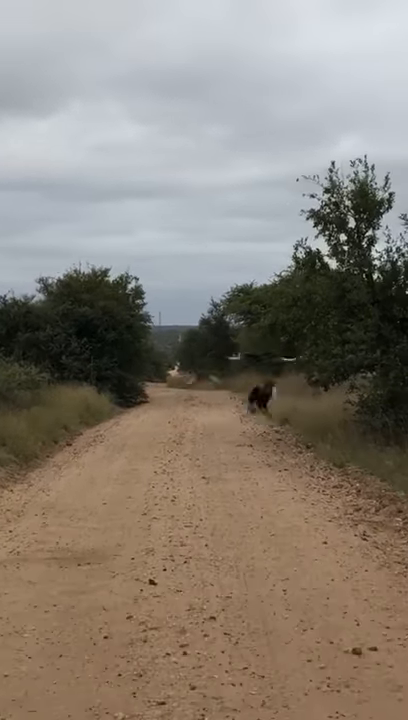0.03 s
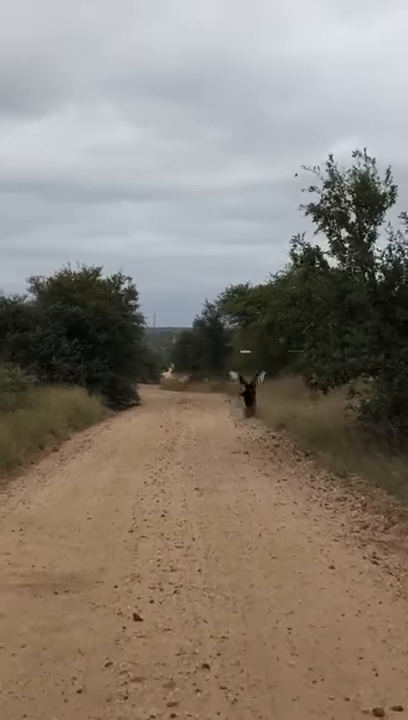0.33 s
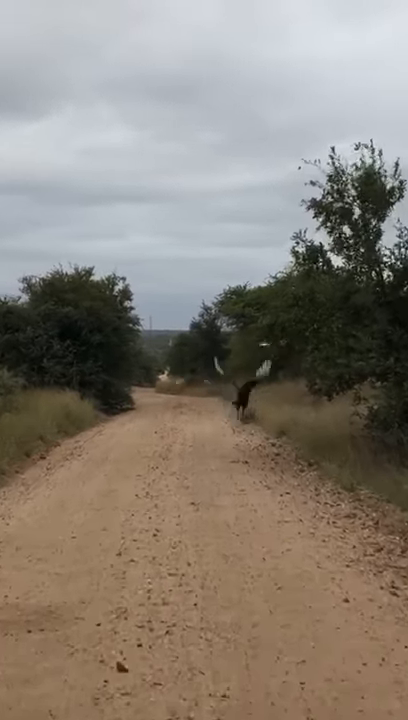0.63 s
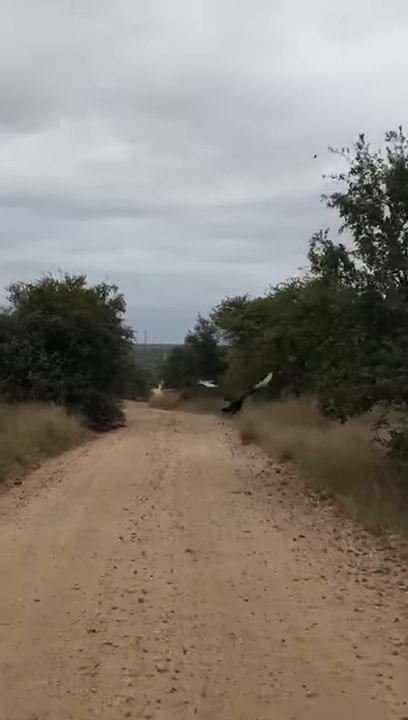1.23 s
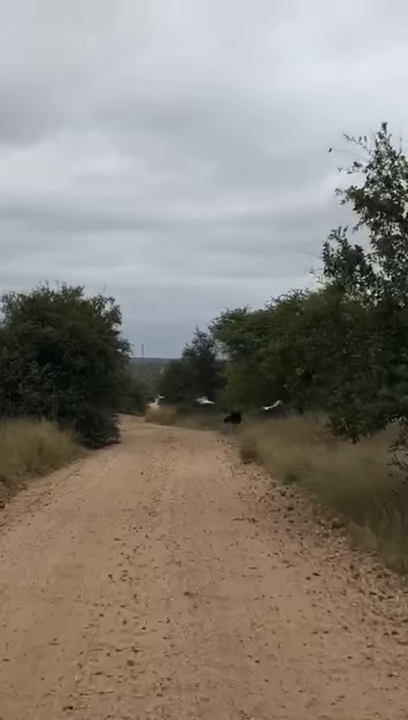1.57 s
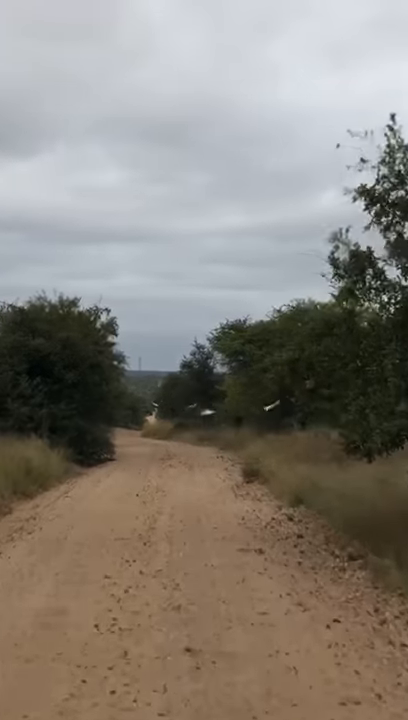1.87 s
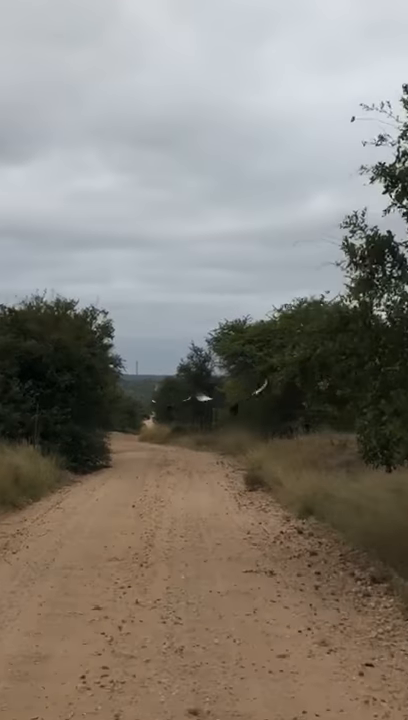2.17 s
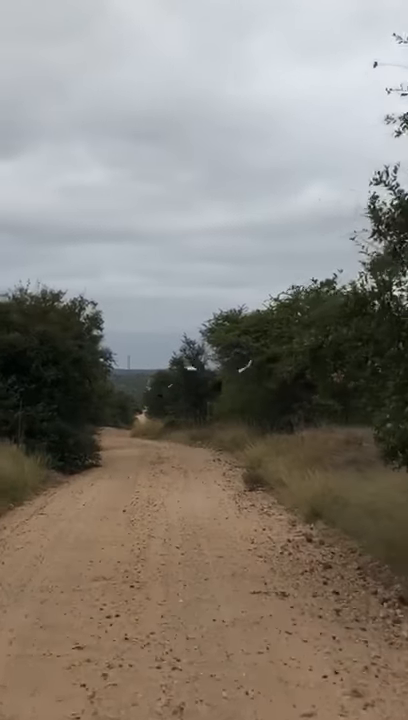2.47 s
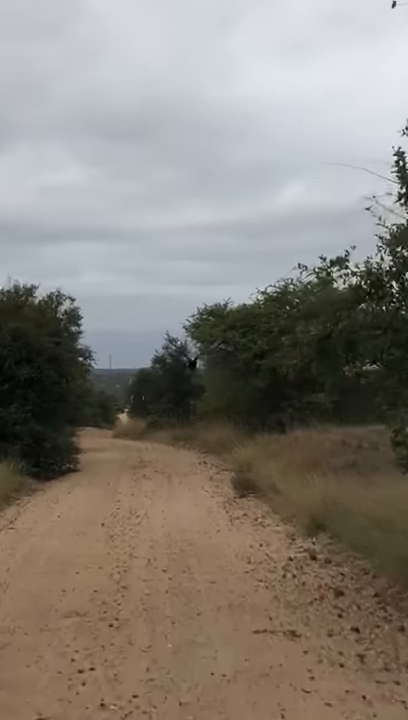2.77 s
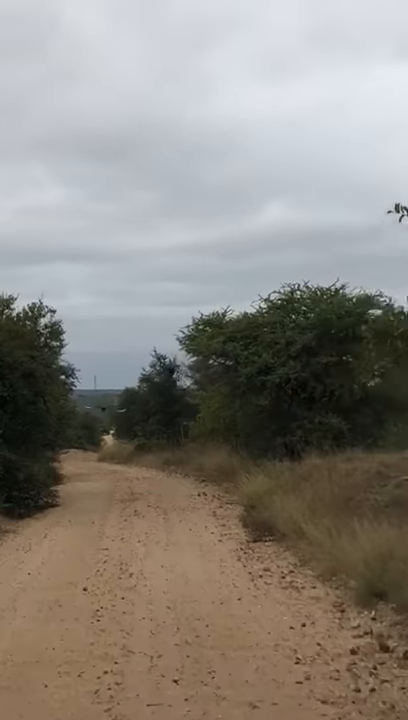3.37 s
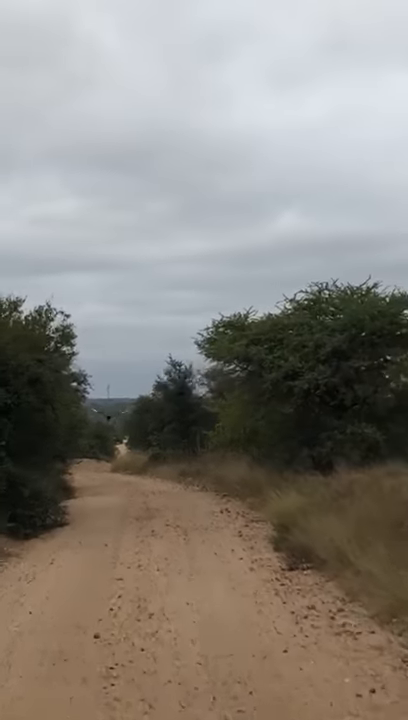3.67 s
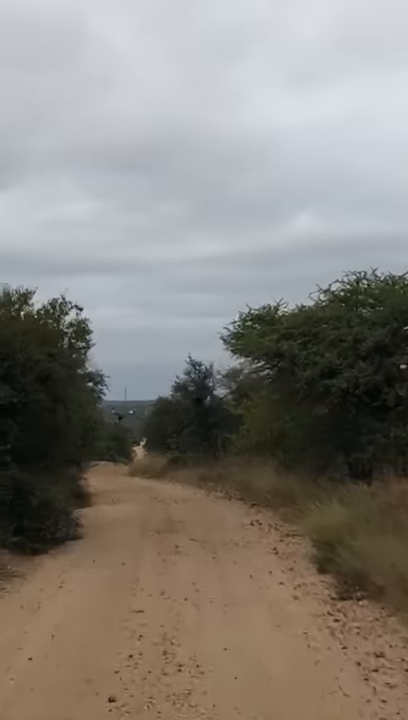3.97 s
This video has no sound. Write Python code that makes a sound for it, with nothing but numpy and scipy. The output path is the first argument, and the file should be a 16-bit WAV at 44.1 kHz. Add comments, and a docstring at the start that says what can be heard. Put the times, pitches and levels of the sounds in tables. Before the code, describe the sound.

Low wind rumble and thumps build on the microphone while tyres roll over sand and grit.

```python
"""Wind buffets a microphone on an open vehicle, growing as it rolls along a dirt road.
The airflow rumbles at the microphone port, and single eddies thump and flutter across it, harder
towards the end. Behind them the tyres roar on sand and grit, and the rushing air hisses ever brighter.
Faint details pass by: a stone ticks, a thin whistle and a narrow hiss swell, the tyres ring briefly."""
import sys
import numpy as np
from scipy import signal
from scipy.fft import rfft, irfft
from scipy.io import wavfile
from scipy.ndimage import uniform_filter1d

SR = 44100
rng = np.random.default_rng(int(sys.argv[2]) if len(sys.argv) > 2 else 0)


def bounce(signal):
    """Save signal as a 16-bit WAV file at the path given by the first command-line argument."""
    frames = np.transpose(np.atleast_2d(signal))
    limited = np.clip(frames, -1, 1)
    pcm = np.round(limited * 32767).astype(np.int16)
    wavfile.write(sys.argv[1], SR, pcm)


N = 176400
T = np.arange(N) / SR

# Faders of the road bed, before their trims: time_s, roar_db, gravel_db, grit_db, air_db
ROAD_FADERS = [(0, -41, -45.5, -53, -61), (.52, -39, -45.5, -53.5, -60.5), (1.05, -38, -45.5, -52, -58),
               (1.39, -36, -46.5, -51.5, -57), (1.85, -36, -40.5, -50, -55), (2.09, -36.5, -41, -47.5, -52),
               (2.28, -34.5, -40, -50, -54), (2.58, -34.5, -39, -49, -55.5),
               (2.8, -35.5, -41.5, -50, -54.5), (2.96, -35.5, -40, -49.5, -52.5),
               (3.21, -36, -40, -48.5, -49.5), (3.41, -34, -40.5, -48, -50.5),
               (3.7, -36.5, -39, -48, -48.5), (3.88, -34, -39.5, -47, -47.5), (4, -31.5, -38, -46.5, -47)]
# Tone colour of its four layers, dark to bright: frequency_hz, relative_db
ROAR_SPECTRUM = [(100, -28), (200, -6.5), (330, -4), (490, -2.5), (680, -0.5), (850, -5), (1100, -11),
                 (1600, -40), (3000, -46)]
GRAVEL_SPECTRUM = [(500, -15.5), (850, -2.5), (1100, -0.5), (1450, -1), (1700, -3), (1950, -4.5),
                   (2300, -11.5), (3000, -18), (5000, -53)]
GRIT_SPECTRUM = [(1400, -21), (2200, 1), (2800, -3), (3300, 1), (4200, -3), (5000, -6), (6500, -19),
                 (10000, -40)]
AIR_SPECTRUM = [(3000, -56), (4800, 1.5), (5900, 4.5), (7000, 0.5), (8000, -1), (9300, -3), (11500, -4.5),
                (14000, -55)]
# Resonances of the ringing tyres and of a narrow hiss of air: pitch_hz, width_hz, relative_db
TYRE_RESONANCES = [(1197, 56, -0.5), (1295, 24, -3), (1427, 64, 0), (1645, 29, -7)]
HISS_RESONANCES = [(5800, 770, 0)]
# Fader of the wind rumble, before its trim: time_s, level_db
WIND_FADER = [(0, -39.5), (.09, -31.5), (.37, -33.5), (.48, -35.5), (.68, -32), (.77, -39.5), (.83, -35),
              (1.0, -41.5), (1.18, -40), (1.27, -32.5), (1.34, -43.5), (1.5, -30), (1.66, -25),
              (1.72, -32.5), (1.95, -24), (2.07, -35), (2.19, -28), (2.28, -34.5), (2.48, -26.5),
              (2.62, -29), (2.75, -28), (2.84, -24), (2.9, -20.5), (2.97, -30), (3.07, -20.5), (3.23, -22),
              (3.3, -18), (3.42, -20.5), (3.52, -17), (3.59, -20), (3.69, -17), (3.78, -19), (3.84, -20),
              (3.92, -19), (4, -24)]
# Tone colour of the rumble in light and in strong wind: frequency_hz, relative_db
LIGHT_WIND_SPECTRUM = [(20, -32), (32, -10), (45, -6), (62, 1.5), (85, -0.5), (120, -5.5), (180, -11.5),
                       (270, -26), (500, -40), (1200, -90)]
STRONG_WIND_SPECTRUM = [(15, -45), (30, -26), (45, -27), (62, 0.5), (85, -20), (118, 0), (165, -8),
                        (210, -2), (260, -8.5), (330, -16), (500, -24), (900, -58), (2000, -79)]
# Eddies hitting the port (thump before its trim): start_s, thump_db, flutter_db, cutoff_hz, rise_s
EDDIES = [(0.099, -23.5, -37, 160, 0.0035), (0.332, -19.5, -38, 220, 0.0034),
          (0.635, -28, -32, 400, 0.0046), (0.806, -28, -36, 300, 0.0055), (1.265, -31.5, -35, 200, .004),
          (1.544, -30, -36, 200, 0.003), (1.606, -28, -38, 200, .004), (1.655, -31, -31, 450, 0.0039),
          (1.831, -14.5, -17.5, 420, 0.0029), (1.903, -13.5, -23.5, 231, 0.0035),
          (1.949, -28, -40, 250, .004), (2.449, -18, -24.5, 450, 0.0036), (2.527, -12, -22, 228, 0.0032),
          (2.538, -18, -33, 1000, 0.0015), (2.659, -19, -17.5, 475, 0.002), (2.664, -14, -13.5, 207, 0.003),
          (2.788, -19.5, -20, 303, 0.0043), (2.837, -26, -15.5, 1160, 0.0014),
          (2.868, -20, -24.5, 656, 0.0033), (2.889, -10, -28, 500, .004), (3.098, -25, -19.5, 1040, .002),
          (3.116, -24, -12.5, 210, 0.0036), (3.271, -19, -18.5, 836, .0025), (3.311, -17, -11, 710, 0.0027),
          (3.358, -9.5, -17, 685, 0.0054), (3.391, -27, -17.5, 710, 0.0015),
          (3.481, -10, -14.5, 740, 0.0027), (3.506, -17, -20, 220, 0.0063), (3.519, -12, -13, 770, 0.002),
          (3.556, -19, -24, 470, 0.0057), (3.678, -21, -20.5, 600, 0.0064),
          (3.699, -23, -15.5, 600, 0.0025), (3.71, -32, -13.5, 700, 0.0035), (3.738, -20, -26, 200, 0.0032),
          (3.757, -10, -6.5, 260, 0.0038), (3.76, -23, -9, 740, 0.0039), (3.765, -23, -11.5, 1540, 0.0017),
          (3.775, -6, -9, 690, 0.0027), (3.81, -25, -15.5, 750, 0.0017), (3.861, -9, -19, 506, 0.0041),
          (3.881, -22, -11, 660, 0.0035), (3.896, -33, -13, 580, 0.0027)]

ROAR_TRIM_DB, GRAVEL_TRIM_DB, GRIT_TRIM_DB, AIR_TRIM_DB = -1, -0.42, 0.98, 1
RUMBLE_TRIM_DB, THUMP_TRIM_DB = 1, -3.5
LIGHT_WIND_DB, STRONG_WIND_DB = -22.5, -13.5  # fader range over which the two wind colours crossfade


def from_db(db):
    """Decibels to gain."""
    return 10 ** (np.asarray(db) / 20)


def unit_rms(x):
    """Scale to rms 1."""
    return x / np.sqrt(np.mean(x ** 2) + 1e-20)


def fader_curves(rows):
    """One curve per fader column, sample by sample."""
    time_s, *columns = np.transpose(rows)
    return [np.interp(T, time_s, column) for column in columns]


def filtered(x, hz, kind, order):
    """A Butterworth filter."""
    return signal.sosfilt(signal.butter(order, hz, kind, fs=SR, output="sos"), x)


def coloured(noise, spectrum):
    """Give a noise a tone colour, at rms 1."""
    hz, db = np.transpose(spectrum)
    bins_hz = np.maximum(np.fft.rfftfreq(N, 1 / SR), 1)
    gain = from_db(np.interp(np.log(bins_hz), np.log(hz), db))
    return unit_rms(irfft(rfft(noise) * gain, N))


def noise_band(edges_hz):
    """Band-passed noise at rms 1."""
    return unit_rms(filtered(rng.standard_normal(N), edges_hz, "band", order=2))


def drift(rate_hz):
    """A random wander at rms 1, mostly slower than rate_hz."""
    bins_hz = np.fft.rfftfreq(N, 1 / SR)
    return unit_rms(irfft(rfft(rng.standard_normal(N)) / (1 + (bins_hz / rate_hz) ** 2), N))


def swell(peak_s, half_s, level_db):
    """A bell-shaped fade in and out."""
    return from_db(level_db) * np.exp(-((T - peak_s) / half_s) ** 2)


def burst(noise, rise_s, window_samples):
    """Level out the later half of a noise and give it an attack and decay; peak about 1."""
    envelope = np.sqrt(2 * uniform_filter1d(noise * noise, size=window_samples) + 1e-12)
    even = (noise / envelope)[len(noise) // 2:]
    age = T[:len(even)] / rise_s
    return even * age * np.exp(1 - age)


def rush(spectrum, level_db, flicker_db, rate_hz):
    """A rushing noise whose level flickers a little."""
    return from_db(level_db + flicker_db * drift(rate_hz)) * coloured(rng.standard_normal(N), spectrum)


def resonant_noise(resonances):
    """Noise singing in narrow bands, at rms 1."""
    return unit_rms(sum(from_db(db) * noise_band([hz - width / 2, hz + width / 2])
                        for hz, width, db in resonances))


def road_bed():
    """Tyres roar on sand, gravel and grit under the hiss of passing air."""
    roar_db, gravel_db, grit_db, air_db = fader_curves(ROAD_FADERS)
    return (rush(ROAR_SPECTRUM, roar_db + ROAR_TRIM_DB, flicker_db=0.8, rate_hz=30)
            + rush(GRAVEL_SPECTRUM, gravel_db + GRAVEL_TRIM_DB, flicker_db=1.7, rate_hz=15)
            + rush(GRIT_SPECTRUM, grit_db + GRIT_TRIM_DB, flicker_db=0.73, rate_hz=16)
            + rush(AIR_SPECTRUM, air_db + AIR_TRIM_DB, flicker_db=0.74, rate_hz=29))


def whistle(pitch_hz=3240, waver_hz=9):
    """One thin, faint tone that wavers a little in pitch."""
    hz = pitch_hz + waver_hz * drift(rate_hz=14)
    tone = unit_rms(np.sin(2 * np.pi * np.cumsum(hz) / SR))
    return swell(peak_s=1.8, half_s=0.33, level_db=-57.5) * tone


def narrow_hiss():
    """The air gives one brief, sibilant hiss."""
    return swell(peak_s=1.9, half_s=0.16, level_db=-56) * resonant_noise(HISS_RESONANCES)


def stone_tick(start_s=0.795, rise_s=0.003, level_db=-55):
    """A small stone flicked by a tyre gives one high tick."""
    age = np.maximum(T - start_s, 0) / rise_s
    return from_db(level_db) * age * np.exp(1 - age) * noise_band(edges_hz=(7000, 9200))


def tyre_ring():
    """The tyres ring on one stretch of road."""
    return swell(peak_s=2.52, half_s=0.51, level_db=-42.5) * resonant_noise(TYRE_RESONANCES)


def wind_rumble(puff_db=1.6, evenness=0.6):
    """Turbulence at the port; stronger wind carries smaller eddies and reaches higher."""
    wind_db, = fader_curves(WIND_FADER)
    flow = rng.standard_normal(N)
    strength = np.clip((wind_db - LIGHT_WIND_DB) / (STRONG_WIND_DB - LIGHT_WIND_DB), 0, 1)
    light, strong = coloured(flow, LIGHT_WIND_SPECTRUM), coloured(flow, STRONG_WIND_SPECTRUM)
    rumble = (1 - strength) * light + strength * strong
    envelope = np.sqrt(uniform_filter1d(rumble * rumble, size=2600) + 1e-9)
    steadied = rumble / envelope ** evenness  # tames the noise's own surges
    puffs = from_db(puff_db * drift(rate_hz=24))
    return from_db(wind_db + RUMBLE_TRIM_DB) * unit_rms(puffs * steadied)


def eddy_buffets(thump_band_hz=(67.6, 155), port_ring_hz=(478, 516)):
    """Each eddy is a low thump plus a shorter flutter that rings the port: dull if slow, a crack if fast."""
    track = np.zeros(N + SR)
    for start_s, thump_db, flutter_db, cutoff_hz, rise_s in EDDIES:
        thump_noise, flutter_noise = rng.standard_normal((2, SR // 5))
        low_end = filtered(thump_noise, thump_band_hz, "band", order=2)
        thump = burst(low_end, rise_s=0.0076, window_samples=900)
        darkened = filtered(flutter_noise, 417, "low", order=1)
        mids = filtered(darkened, 130, "high", order=2)
        body = filtered(mids, cutoff_hz, "low", order=5)
        skirt = filtered(mids[::-1], 2 * cutoff_hz, "low", order=4)  # reversed to decorrelate it
        flutter = burst(body + from_db(-17) * skirt, rise_s, window_samples=300)
        ring = from_db(-1) * filtered(flutter, port_ring_hz, "band", order=1)
        hit = from_db(thump_db + THUMP_TRIM_DB) * thump + from_db(flutter_db) * (flutter + ring)
        start = int(start_s * SR)
        track[start:start + len(hit)] += hit
    return track[:N]


def scene(wind_low_cut_hz=24.5):
    """Mono mix: wind up front, the road bed and faint passing details behind."""
    resonances = tyre_ring() + narrow_hiss()
    wind = filtered(wind_rumble() + eddy_buffets(), wind_low_cut_hz, "high", order=2)
    return (wind + road_bed() + resonances + whistle() + stone_tick())[None]


def record(dry):
    """A soft clip rounds the strongest peaks; a steep high cut at 11750 Hz takes off the top."""
    rounded = dry / (1 + dry ** 6) ** (1 / 6)
    high_cut = signal.ellip(12, 0.1, 90, 11750, fs=SR, output="sos")
    return signal.sosfilt(high_cut, rounded)


dry = scene()
out = record(dry)
bounce(out)
```